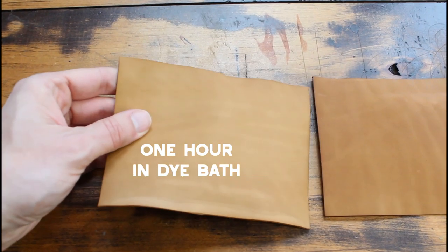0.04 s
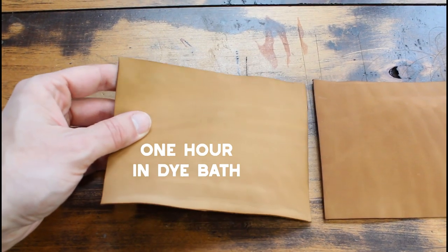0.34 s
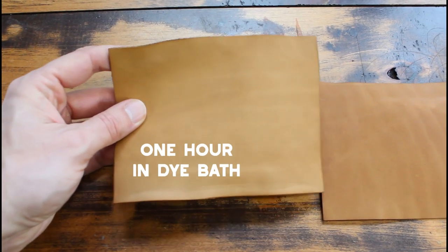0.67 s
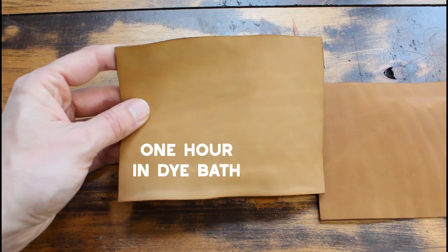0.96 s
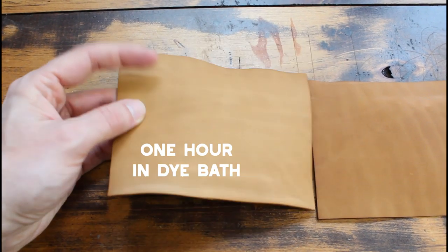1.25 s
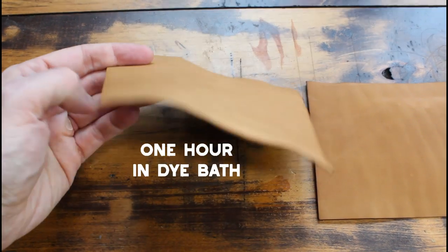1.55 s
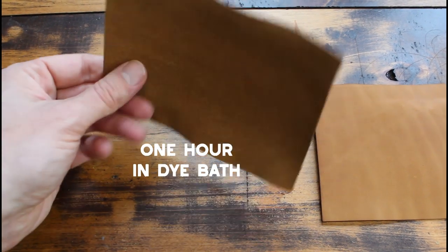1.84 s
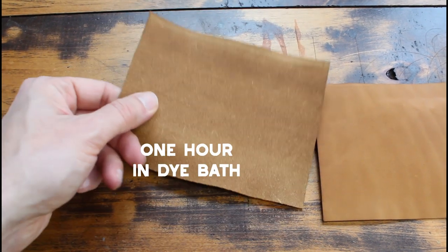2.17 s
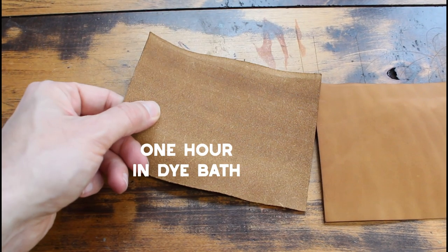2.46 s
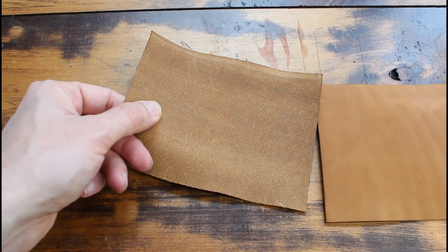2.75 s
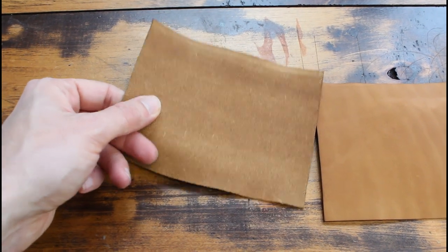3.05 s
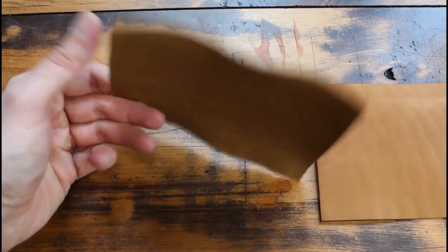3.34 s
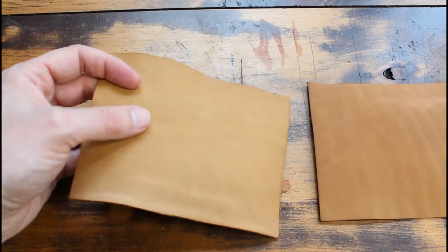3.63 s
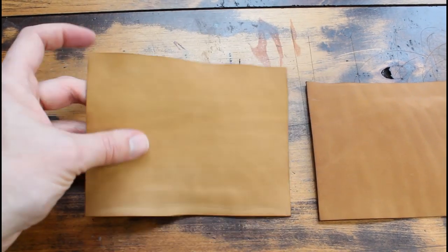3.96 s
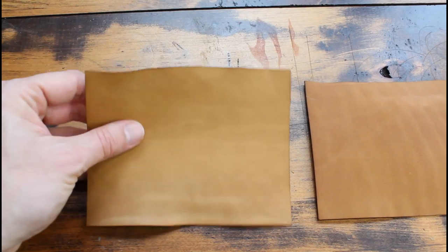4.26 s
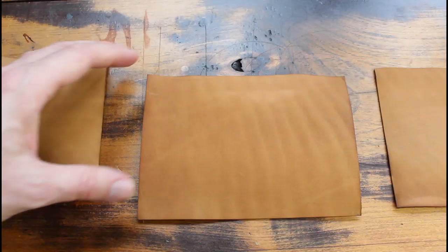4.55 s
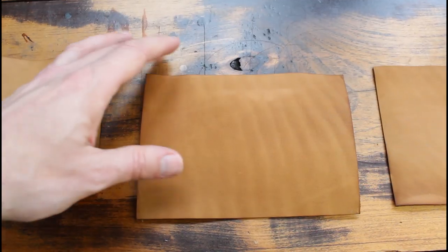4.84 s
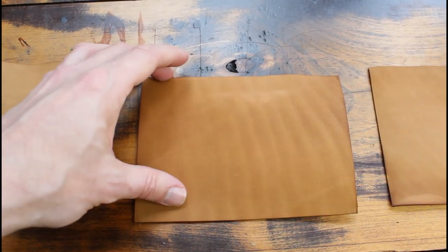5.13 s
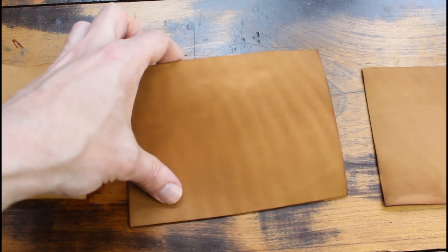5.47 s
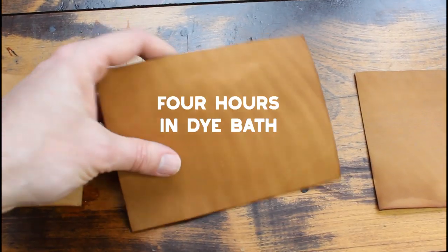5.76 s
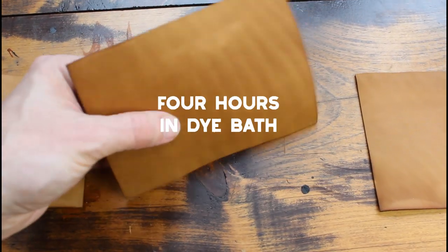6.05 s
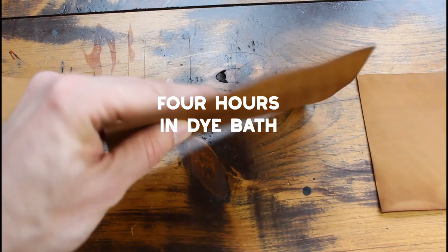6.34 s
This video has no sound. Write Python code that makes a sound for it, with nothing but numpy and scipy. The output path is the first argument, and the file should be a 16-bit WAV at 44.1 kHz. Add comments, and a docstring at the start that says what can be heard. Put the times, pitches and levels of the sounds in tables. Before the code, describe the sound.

Close to the microphone in a small, quiet room, fingers handle pieces of leather on a wooden bench. A light tap opens, and soft rubbing with tiny ticks follows. Two distinct taps come near the middle as an edge lands on the wood. Two brief sliding scrapes follow, and finally a soft knock makes the bench ring briefly, over faint steady air noise.

```python
"""A leather edge taps on wood, then soft rubbing follows as a hand slides, lifts and turns small pieces
on a workbench, close to the microphone. The leather drags by stick-slip friction, a stream of tiny
impulses, while its edges tap and scuff the wood and a forearm shifts dully. Soft knocks, the strongest
at the end, set the bench's modes ringing. A small, quiet room answers with a few reflections
and a short tail, over faint steady air noise."""
import sys
import numpy as np
from scipy import signal
from scipy.fft import rfft, irfft
from scipy.io import wavfile
from scipy.ndimage import uniform_filter1d

SR = 44100
rng = np.random.default_rng(int(sys.argv[2]) if len(sys.argv) > 2 else 0)


def unload_audio(sound):
    """Save the sound as a 16-bit wav file, at the path given as the first command line argument."""
    columns = np.transpose(np.atleast_2d(sound))
    # keep every value between -1 and 1, then stretch to whole-number steps
    steps = np.round(np.clip(columns, -1, 1) * 32767)
    wavfile.write(sys.argv[1], SR, steps.astype(np.int16))


N = 291060
TIME = np.arange(N) / SR

# strokes of fingers and leather:
# (time of top speed [s], rise [s], fall [s], drag level [dB], hiss level [dB], nap level [dB])
RUB_STROKES = [(.005, 0.011, 0.069, -72, -60, -68), (.2, 0.17, 0.08, -62.5, -69, -88),
               (.32, .008, .015, -67, -61, -75), (.42, 0.054, 0.092, -60, -64, -80),
               (.555, 0.033, 0.018, -57.5, -68, -82), (.63, .015, 0.14, -55, -67, -85),
               (.78, 0.12, 0.043, -55.5, -62.5, -84), (1.11, 0.019, 0.063, -58, -56.5, -68),
               (1.21, 0.033, 0.014, -53.5, -55.5, -68), (1.275, 0.0078, 0.018, -53.5, -70, -81),
               (1.34, .025, .07, -54, -66, -83), (1.44, 0.061, 0.077, -56, -60.5, -69),
               (1.535, 0.044, .022, -62, -58, -62.5), (1.815, 0.046, 0.032, -56.5, -54.5, -67),
               (1.92, .03, 0.04, -63, -63, -66), (2.125, 0.054, 0.059, -53.5, -54, -71),
               (2.285, .012, 0.017, -54, -58.5, -77), (2.325, 0.012, 0.011, -51, -62, -86),
               (2.42, .04, 0.13, -63, -69, -89), (2.845, .012, 0.025, -56, -61, -82),
               (3.19, .04, 0.071, -53.5, -57.5, -68), (3.35, 0.075, 0.098, -62, -57, -65),
               (3.58, 0.1, 0.068, -60, -59.5, -67.5), (3.72, 0.1, 0.29, -50.5, -57, -69),
               (3.995, 0.022, 0.028, -53, -53, -65), (4.06, 0.027, .03, -57, -66, -58.5),
               (4.134, 0.017, .022, -54.5, -60, -57.5), (4.47, 0.21, 0.057, -67, -58.5, -69),
               (4.6, 0.016, 0.0065, -51.5, -59, -65), (5.08, 0.008, 0.032, -51, -62.5, -72),
               (5.16, 0.046, 0.1, -61, -62, -82), (5.295, 0.013, 0.041, -63, -57, -77),
               (5.51, 0.097, 0.033, -52, -59.5, -70), (5.676, 0.02, 0.023, -50.5, -57.5, -69),
               (5.752, 0.035, 0.067, -52, -60.5, -59.5), (5.855, 0.035, .03, -46, -59, -63),
               (6.11, .025, .025, -68, -65, -58.5), (6.275, 0.059, 0.019, -49, -54, -61)]
# spectra of the sheet's broad resonance, its grain and its fine nap: (frequency [Hz], level [dB])
DRAG_SPECTRUM = [(250, -17), (900, -6.5), (1150, 0.5), (1350, 6.5), (1590, 2), (1800, 2), (2050, -11.5),
                 (2350, -7.5), (3000, -10), (6000, -55)]
HISS_SPECTRUM = [(1200, -8), (2300, 2), (2800, 0.5), (3250, 1), (3750, 2), (4400, -3), (5500, -5.5),
                 (7000, -14.5), (11000, -33)]
NAP_SPECTRUM = [(3500, -6.5), (6500, 0.5), (8700, -3), (10500, -8), (15500, -20)]
# a narrow resonance singing under steady rubbing, one piece pushed aside, another dragged up off the wood:
# (time [s], level [dB])
SING_ENVELOPE = [(2.05, -71), (2.3, -67), (2.7, -73), (3.2, -59.5), (3.55, -70), (3.9, -71), (4.05, -60.5),
                 (4.4, -66), (4.62, -76)]
PUSH_ENVELOPE = [(4.21, -56), (4.236, -51), (4.298, -50.5), (4.334, -36), (4.356, -45.5), (4.472, -60),
                 (4.486, -49.5), (4.53, -67)]
LIFT_ENVELOPE = [(5.905, -51), (5.947, -47.5), (5.955, -36.5), (5.988, -33), (6.008, -39.5), (6.036, -37.5),
                 (6.054, -49), (6.11, -50), (6.18, -57.5)]
# spectra of the same three: (frequency [Hz], level [dB])
SING_SPECTRUM = [(1100, -51), (1400, -23), (1475, 2.5), (1525, -12), (1590, 2.5), (1670, -11), (2100, -44)]
PUSH_SPECTRUM = [(300, -29), (950, -16.5), (1250, -9), (1600, 2.5), (1850, -10), (2300, -3), (2850, -14.5),
                 (4000, -15.5), (5700, -15.5), (7300, -19), (8800, -18), (10300, -28.5), (15500, -41)]
LIFT_SPECTRUM = [(200, -30), (400, -21), (680, -15), (860, -2), (1090, 0), (1450, -3), (1850, -6),
                 (2600, -5), (3100, -11), (4600, -14), (6500, -24), (8700, -26), (11000, -37), (15500, -48)]
# edges landing on wood: (time [s], peak level [dB], pitch [Hz], hardness [dB/octave above the pitch])
EDGE_TAPS = [(.0350, -22.5, 1470, -13.5), (0.1244, -43, 1330, -14), (.2444, -37, 1370, -10),
             (.556, -47, 1360, 4), (0.612, -42, 1650, -2), (1.1917, -35, 1500, 4), (1.211, -41, 1530, 2),
             (1.3438, -39, 1340, -3), (1.400, -40, 1280, 1), (1.539, -40.5, 1400, 4),
             (2.3155, -39, 1570, 1.5), (2.326, -40.5, 1630, 3), (3.5933, -8.5, 1540, 1),
             (3.724, -17.5, 1450, -2), (3.7824, -41, 1400, 3), (4.209, -36, 2000, 9),
             (4.4866, -39, 1740, 5), (5.090, -39, 1350, 3), (5.521, -42, 1400, -1), (5.675, -38, 1390, -16),
             (5.9245, -25, 1290, 4.5), (5.9533, -27, 1520, -2), (5.964, -28, 1700, -5),
             (6.158, -32.5, 1160, -10)]
# edges flicking past each other: (time [s], level [dB], decay time [s])
EDGE_SCUFFS = [(.003, -51.5, .025), (.611, -55, .003), (2.112, -52, .02), (3.346, -60, 0.01),
               (3.4067, -31.5, 0.0036), (3.5935, -25, 0.0011), (3.5993, -35, 0.00099), (3.609, -33, 0.0023),
               (3.7240, -30, 0.0017), (5.9242, -42.5, 0.0062), (6.3668, -37.5, 0.0023), (6.394, -35, .002),
               (6.405, -36, .007)]
# blows to the bench and their rebounds: (time [s], peak level [dB], hardness [dB/octave in the treble])
BENCH_KNOCKS = [(3.5925, -27, 2), (3.7255, -35.5, -0.5), (6.3668, -15.5, 3), (6.3719, -26.5, -3),
                (6.3957, -25.5, 6), (6.408, -26.5, 8), (6.434, -41, 11), (6.443, -37, 2)]
# the bench's modes of vibration: (frequency [Hz], level [dB], time to decay 60 dB [s])
BENCH_MODES = [(105, -2, .2), (132, 6, .2), (249, 2, .25), (387, -8, .35), (422, -7, .42), (457, -9, .3),
               (573, -5, .4), (660, -6, .25), (735, -5, .3), (879, -1, .45), (1000, -4, .3), (1056, -5, .4),
               (3800, 3, .025)]
# the forearm moving on the bench: (time of top speed [s], rise [s], fall [s], level [dB])
ARM_STROKES = [(.01, .05, 0.14, -58), (.38, 0.13, 0.068, -58.5), (1.4, 0.11, .2, -64.5),
               (2.88, 0.041, 0.15, -57.5), (3.5, .09, 0.042, -56.5), (5.08, 0.61, 0.22, -63),
               (5.37, 0.17, 0.2, -57.5), (6.0, 0.28, 0.6, -58.5), (6.45, .1, 0.2, -51)]
# spectra of these contacts: (frequency [Hz], level [dB])
TAP_SPECTRUM = [(60, -45), (130, -26), (250, -19), (400, -21), (700, -12), (1100, -5), (1550, 0),
                (2050, -5), (2600, -16), (4000, -23), (6500, -35), (8200, -33), (11000, -47), (16000, -58)]
SCUFF_SPECTRUM = [(200, -15), (700, -4), (1300, 7), (2100, 2.5), (2800, 4.5), (3800, 4.5), (5200, -4),
                  (7000, -14), (8800, -18), (11000, -28), (15500, -51)]
KNOCK_SPECTRUM = [(50, -28), (95, 1), (130, 0), (185, -3), (250, 4), (380, 2.5), (700, -6.5), (1150, 0.5),
                  (1600, -7), (2100, -23.5), (3200, -11.5), (3800, -9), (4600, -17.5), (7000, -32),
                  (8900, -31), (12000, -50), (15500, -68)]
ARM_SPECTRUM = [(70, -26), (130, -11), (240, 2.5), (330, -5), (450, 2.5), (750, -5), (1100, -4), (2000, -9),
                (6000, -34)]
# reflections from nearby surfaces: (delay [s], level [dB])
REFLECTIONS = [(.0026, -20), (.0063, -29), (.0088, -17), (.0152, -42), (.0172, -20.5), (.0385, -27)]
# decay of the room's tail: (frequency [Hz], reverberation time [s])
REVERB_TIMES = [(125, 0.12), (500, 0.55), (1500, 0.68), (4000, 0.67), (12000, 0.33)]
# spectra of the tail and of the air noise: (frequency [Hz], level [dB])
TAIL_SPECTRUM = [(100, 14), (250, 7.5), (400, 0.5), (650, 7), (900, 3), (1500, -3.5), (2200, 4),
                 (3500, 1.5), (5000, 2.5), (9000, 2.5), (15000, 3)]
AIR_SPECTRUM = [(30, -4), (70, -20), (115, -5), (180, -7.5), (250, -4), (550, -8), (850, -3), (1200, -8.5),
                (1550, -7.5), (2000, -12), (4000, -14), (7000, -19), (11000, -24), (15800, -32)]
# diffuse sound at the microphone's two ports: (frequency [Hz], left-right correlation [1])
DIFFUSE_COHERENCE = [(60, 0.99), (250, 0.67), (600, 0.5), (1500, 0.37), (4000, 0.047), (9000, 0.018)]
# how the two ports favour the handling: (frequency [Hz], left minus right level [dB])
STEREO_BALANCE = [(120, 1.5), (280, 0.5), (500, -0.5), (1400, -1.6), (2300, -1.2), (4000, 0.5),
                  (12000, 0.5)]


def friction(spectrum, slips_per_s, spread_db, catch_db):
    """Stick-slip friction: random impulses excite a spectrum as the surface catches and lets go."""
    slips = (rng.random(N) < slips_per_s / SR) * rng.choice([-1, 1], N)
    size_db = spread_db * np.clip(rng.standard_normal(N), -2, 2)
    grip_db = catch_db * wander(rate_hz=70)
    return unit_rms(tint(slips * undb(size_db + grip_db), spectrum))


def rubbing():
    """Frictional excitation: coarse slips drum the sheet, finer ones hiss, even ones make it sing."""
    drag = friction(DRAG_SPECTRUM, slips_per_s=2000, spread_db=2.5, catch_db=1.2)
    hiss = friction(HISS_SPECTRUM, slips_per_s=7000, spread_db=2.5, catch_db=.8)
    nap = friction(NAP_SPECTRUM, slips_per_s=7000, spread_db=3, catch_db=.8)
    sing = friction(SING_SPECTRUM, slips_per_s=4000, spread_db=2, catch_db=1)
    drag_gain, hiss_gain, nap_gain = stroke_gains(RUB_STROKES)
    return drag * drag_gain + hiss * hiss_gain + nap * nap_gain + sing * envelope(SING_ENVELOPE)


def slides():
    """Sliding friction: whole pieces scrape over the wood, one pushed and one lifted."""
    push = friction(PUSH_SPECTRUM, slips_per_s=3500, spread_db=6, catch_db=1)
    lift = friction(LIFT_SPECTRUM, slips_per_s=5000, spread_db=3, catch_db=.7)
    return push * envelope(PUSH_ENVELOPE) + lift * envelope(LIFT_ENVELOPE)


def taps():
    """Heavily damped impact: each edge that lands gives a short, dead pulse."""
    out = np.zeros(N)
    for onset, db, pitch, hardness in EDGE_TAPS:
        add(out, onset, -undb(db) * impact_pulse(TAP_SPECTRUM, hardness, pitch))
    return out


def scuffs():
    """Transient friction: a flicked edge gives a burst of slips that swells quickly and decays."""
    force = np.zeros(N)
    for onset, db, decay in EDGE_SCUFFS:
        age = TIME[:SR // 4] / decay
        add(force, onset, undb(db) * 2 * np.sqrt(age) * np.exp(-age))
    return force * friction(SCUFF_SPECTRUM, slips_per_s=25000, spread_db=1, catch_db=0)


def knocks(ring_db=-29):
    """Free vibration: after each blow the bench top rings on as a sum of damped modes."""
    t = TIME[:SR]
    ring = sum(undb(ring_db + db) * np.sin(2 * np.pi * hz * t) * np.exp(-np.log(1000) * t / t60)
               for hz, db, t60 in BENCH_MODES)
    out = np.zeros(N)
    for onset, db, hardness in BENCH_KNOCKS:
        add(out, onset, undb(db) * impact_pulse(KNOCK_SPECTRUM, hardness))
        # a light, hard rebound hardly moves the bench
        add(out, onset, undb(db - 2 * max(hardness, 0)) * ring)
    return out


def forearm(rest_db=-72.5):
    """Low-frequency friction: the forearm shifts dully on the bench and is never quite still."""
    gain = np.hypot(stroke_gains(ARM_STROKES)[0], undb(rest_db))
    return gain * friction(ARM_SPECTRUM, slips_per_s=1200, spread_db=3, catch_db=2.5)


def room(x, tail_db, port_lag_s=.00007):
    """Convolution with the room's impulse response: direct sound, reflections and a diffuse tail."""
    t = TIME[:SR]
    hz, when, cells = signal.stft(diffuse_noise(SR), SR, nperseg=256)
    cells = cells * np.exp(-np.log(1000) * when / at_hz(REVERB_TIMES, hz)[:, None])
    tail = signal.istft(cells, SR)[1][:, :SR]
    build_up = 1 - np.exp(-t / 0.0018)
    early_scatter = 1 + 1.18 * np.exp(-t / 0.01)  # from the bench and tools: stronger, and dies first
    tail = unit_rms(tail * build_up * early_scatter) / np.sqrt(SR)
    response = undb(tail_db) * tint(tail, TAIL_SPECTRUM)
    response[:, 0] += 1  # direct sound
    for k, (delay, db) in enumerate(REFLECTIONS):
        near_port = k % 2
        add(response[near_port], delay, undb([db]))
        add(response[1 - near_port], delay + port_lag_s, undb([db]))
    return signal.fftconvolve(x[None], response, axes=1)[:, :N]


def room_tone(air_db=-58, drone_relative_db=-15, half_width_hz=10):
    """Forced vibration: steady air noise faintly excites the bench's resonances."""
    hz = np.fft.rfftfreq(N, 1 / SR)
    peaks = sum(undb(db) / (1 + ((hz - mode_hz) / half_width_hz) ** 2) for mode_hz, db, _ in BENCH_MODES)
    resonating = irfft(rfft(rng.standard_normal(N)) * peaks, N)
    drone = unit_rms(tint(resonating, AIR_SPECTRUM))
    air = unit_rms(tint(diffuse_noise(N), AIR_SPECTRUM))
    return undb(air_db) * (air + undb(drone_relative_db) * drone)


def diffuse_noise(size):
    """Diffuse-field coherence: two close ports receive like bass but unrelated treble."""
    coherence = np.clip(at_hz(DIFFUSE_COHERENCE, np.fft.rfftfreq(size, 1 / SR)), -1, 1)
    mid, side = rfft(rng.standard_normal((2, size)))
    polarity = np.array([[1], [-1]])
    return irfft(mid * np.sqrt(1 + coherence) + polarity * side * np.sqrt(1 - coherence), size)


def impact_pulse(spectrum, hardness, pitch=1550, size=2048):
    """Minimum-phase pulse of peak 1; the spectrum is shifted so that 1550 Hz falls on the pitch."""
    hz = np.fft.rfftfreq(size, 1 / SR)
    db = at_hz(spectrum, hz * 1550 / pitch) + hardness * np.log2(np.maximum(hz / pitch, 1))
    cepstrum = irfft(np.log(undb(db)))
    # folding the cepstrum onto positive time makes the pulse causal
    cepstrum[1:size // 2] *= 2
    cepstrum[size // 2 + 1:] = 0
    pulse = irfft(np.exp(rfft(cepstrum)))
    return pulse / np.abs(pulse).max()


def stroke_gains(strokes, roundness=1.3):
    """Incoherent addition: strokes swell with speed and sum in power. One gain curve per level column."""
    t = np.linspace(0, N / SR, 4000)
    power = 0
    for fastest, rise, fall, *db in strokes:
        from_peak = np.maximum((fastest - t) / rise, (t - fastest) / fall)
        speed = np.exp(-np.abs(from_peak) ** roundness)  # 1 is pointed, 2 a bell
        power = power + np.outer(undb(db), speed) ** 2
    return [np.interp(TIME, t, np.sqrt(layer)) for layer in power]


def envelope(points):
    """Amplitude envelope through (time [s], level [dB]) points, silent outside their span."""
    times, db = np.transpose(points)
    gain = undb(np.interp(TIME, times, db, left=-140, right=-140))
    return uniform_filter1d(gain, size=200)


def wander(rate_hz):
    """Random modulation: held values, smoothed twice, with a spread near 1."""
    hold = int(SR / rate_hz)
    held = np.repeat(rng.standard_normal(N // hold + 1), hold)
    return np.sqrt(2) * uniform_filter1d(uniform_filter1d(held, hold), hold)[:N]


def tint(x, spectrum):
    """Zero-phase filtering by (frequency [Hz], level [dB]) points."""
    size = x.shape[-1]
    return irfft(rfft(x) * undb(at_hz(spectrum, np.fft.rfftfreq(size, 1 / SR))), size)


def at_hz(points, hz):
    """Interpolation on a logarithmic frequency axis."""
    frequencies, values = np.transpose(points)
    return np.interp(np.log(hz + 1), np.log(frequencies), values)


def add(out, onset_s, sound):
    """Superposition of a sound from its onset."""
    start = max(int(onset_s * SR), 0)
    part = sound[:max(len(out) - start, 0)]
    out[start:start + len(part)] += part


def undb(db):
    """Amplitude ratio of a level in decibels."""
    return 10 ** (np.asarray(db) / 20)


def unit_rms(x):
    """Normalisation to rms 1."""
    return x / np.sqrt(np.mean(x ** 2))


def scene():
    """Superposition: all contacts sound in one room, and each port colours them a little differently."""
    contacts = room(taps(), tail_db=-8)
    contacts += room(rubbing() + slides() + forearm() + scuffs(), tail_db=-6.5)
    contacts += room(knocks(), tail_db=-1.5)
    left = tint(contacts[0], [(hz, db / 2) for hz, db in STEREO_BALANCE])
    right = tint(contacts[1], [(hz, -db / 2) for hz, db in STEREO_BALANCE])
    return np.array([left, right]) + room_tone()


def record(dry, low_cut_hz=88, high_cut_hz=15800):
    """Band limiting: the recorder drops the deep bass and cuts the top."""
    high_pass = signal.butter(4, low_cut_hz, btype="high", fs=SR, output="sos")
    low_pass = signal.ellip(10, .2, 70, high_cut_hz, fs=SR, output="sos")
    return signal.sosfilt(low_pass, signal.sosfilt(high_pass, dry))


dry = scene()
out = record(dry)
unload_audio(out)
```